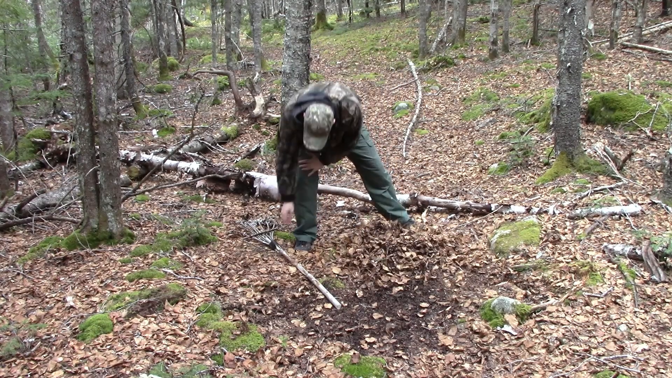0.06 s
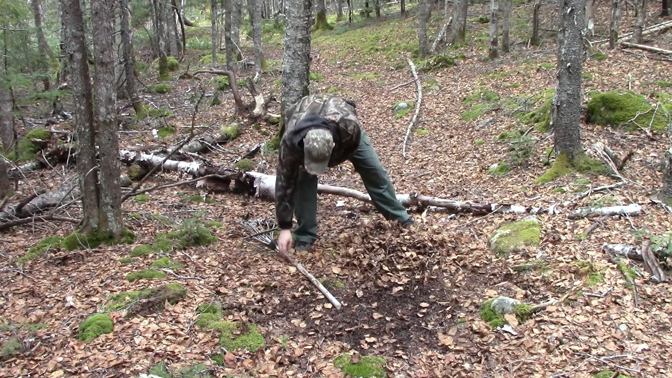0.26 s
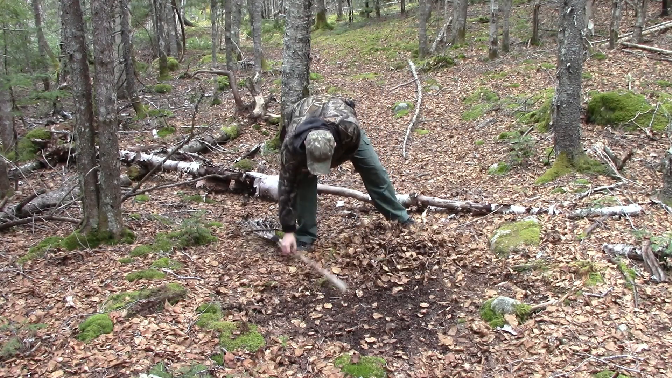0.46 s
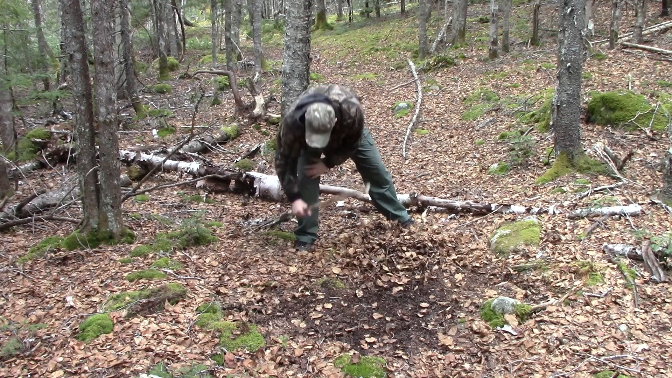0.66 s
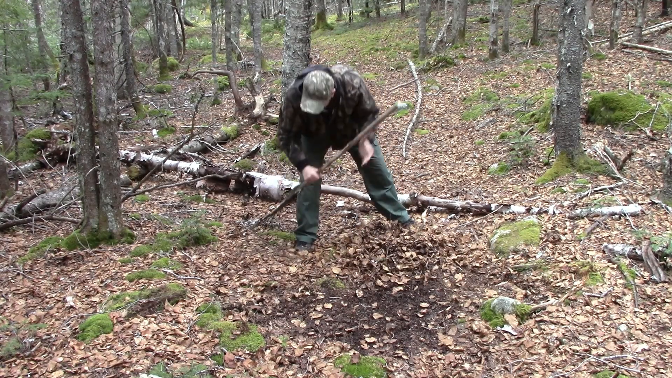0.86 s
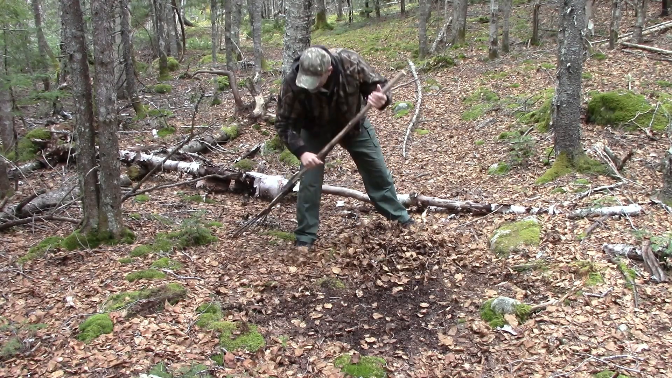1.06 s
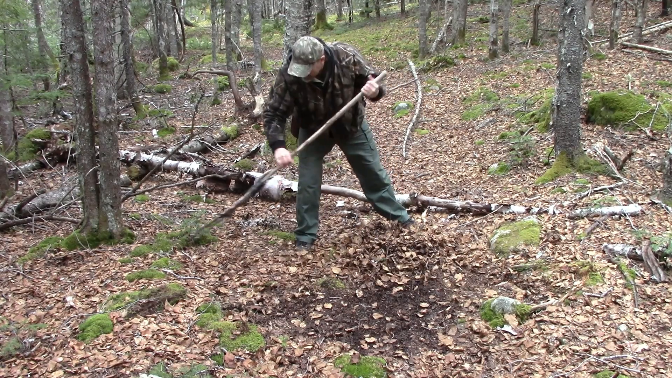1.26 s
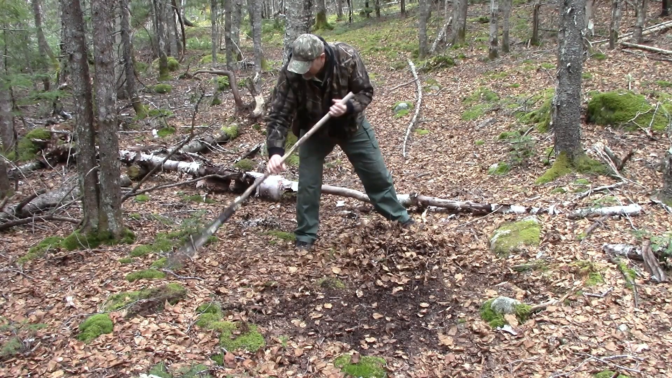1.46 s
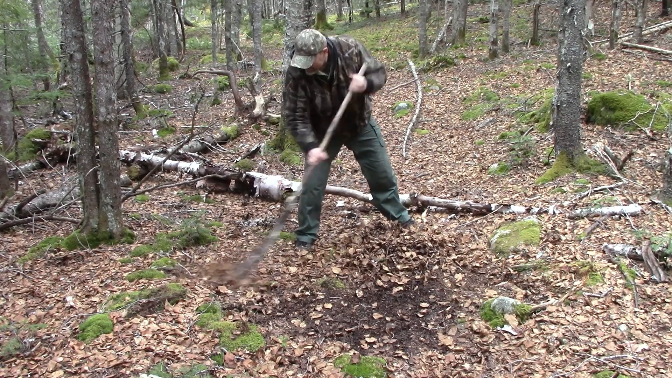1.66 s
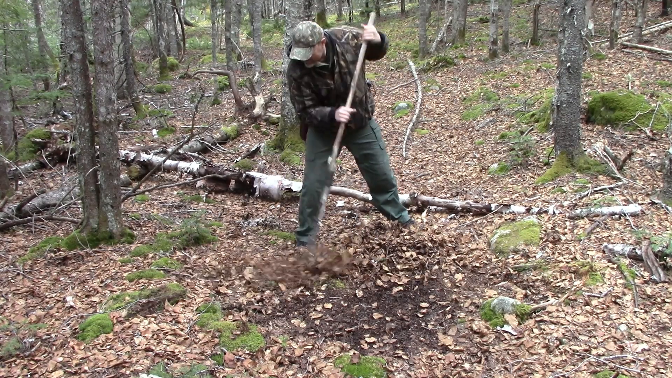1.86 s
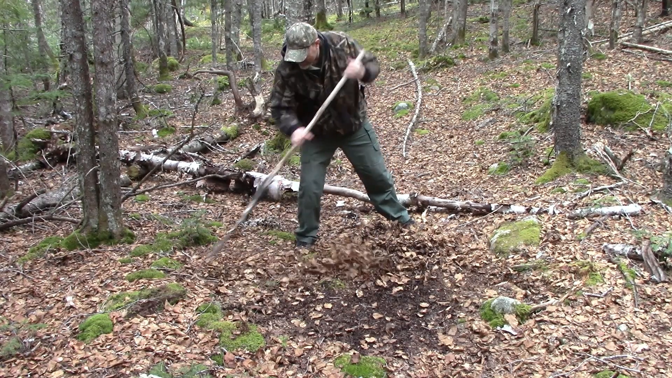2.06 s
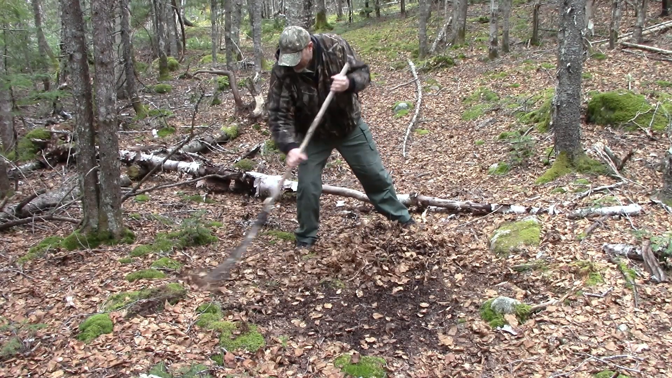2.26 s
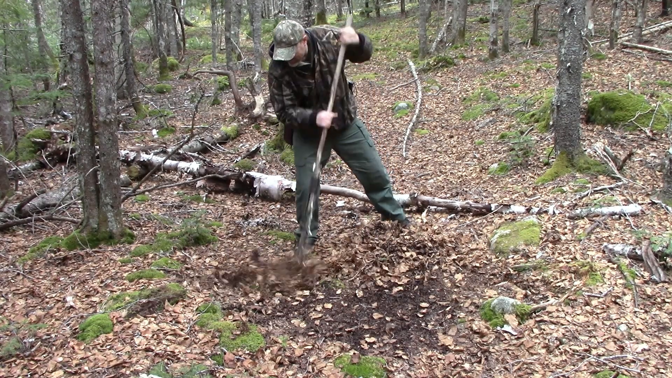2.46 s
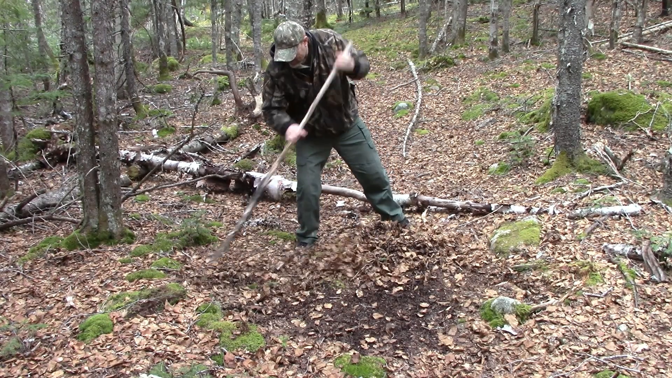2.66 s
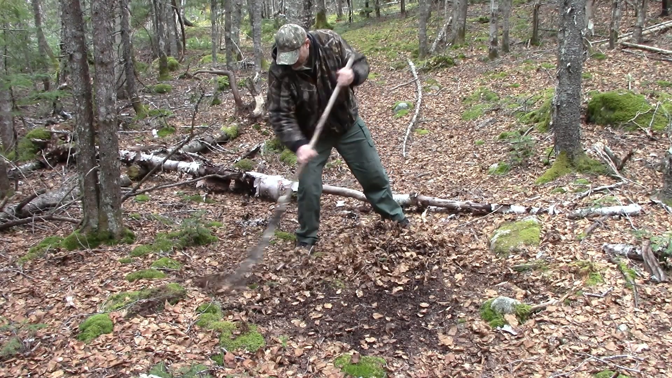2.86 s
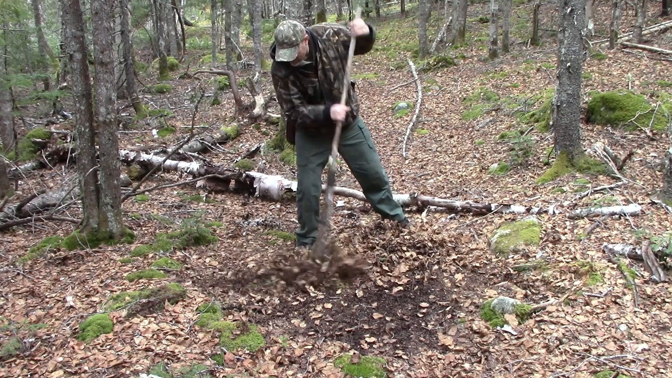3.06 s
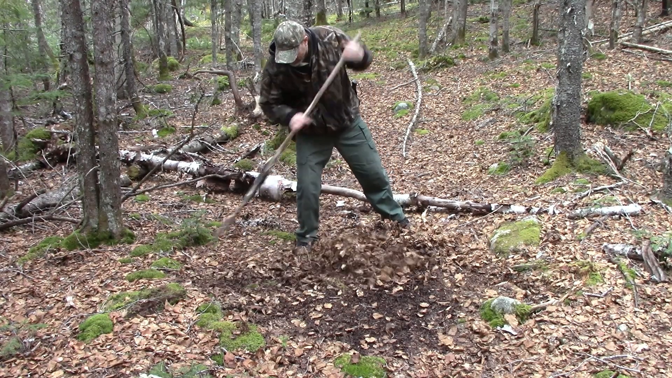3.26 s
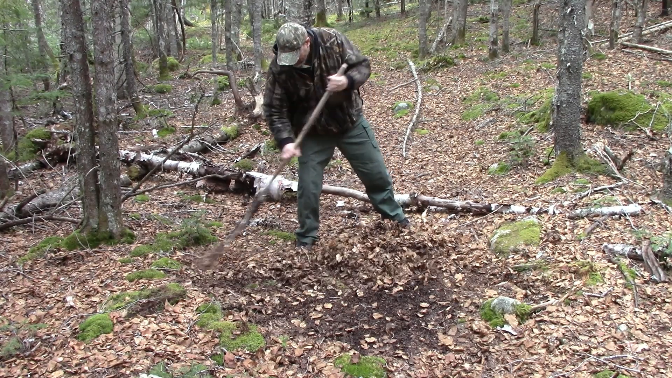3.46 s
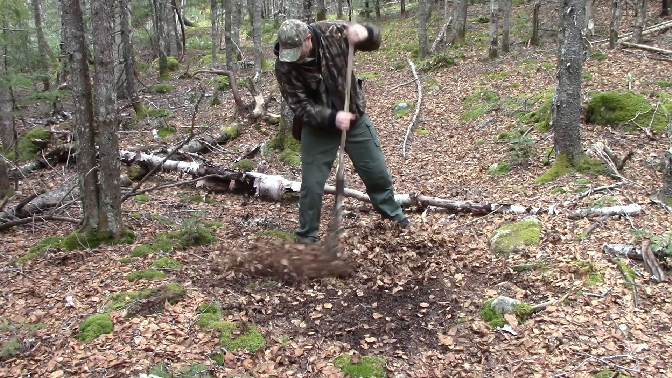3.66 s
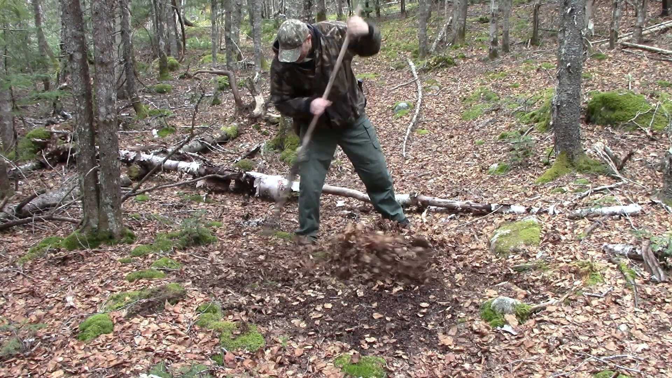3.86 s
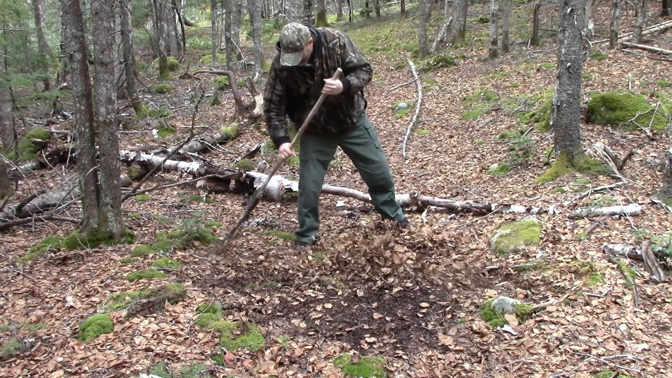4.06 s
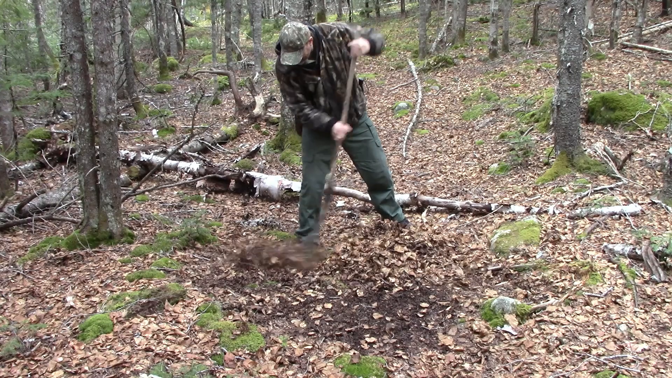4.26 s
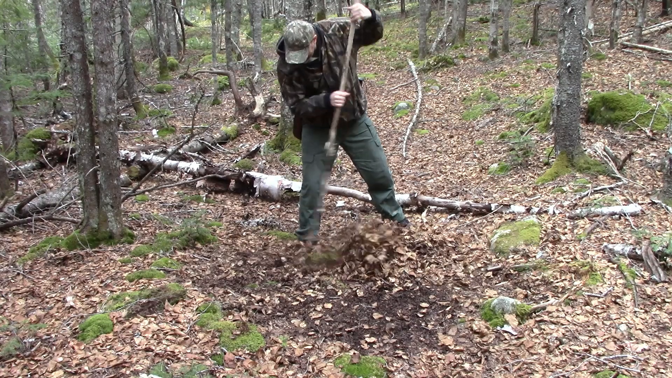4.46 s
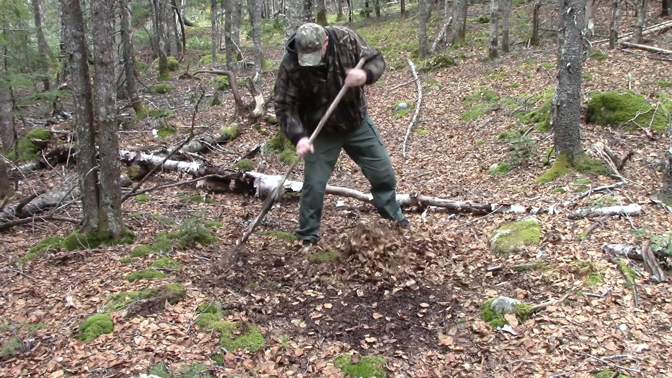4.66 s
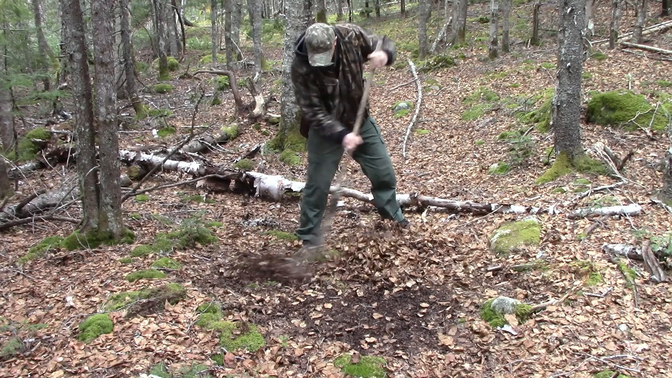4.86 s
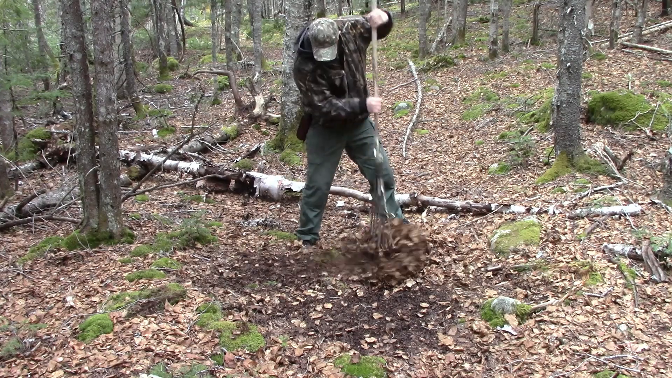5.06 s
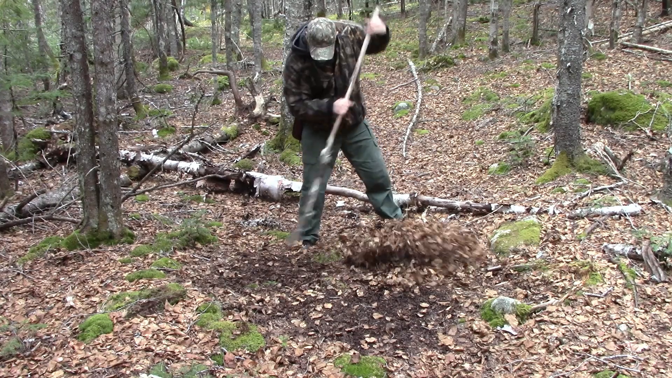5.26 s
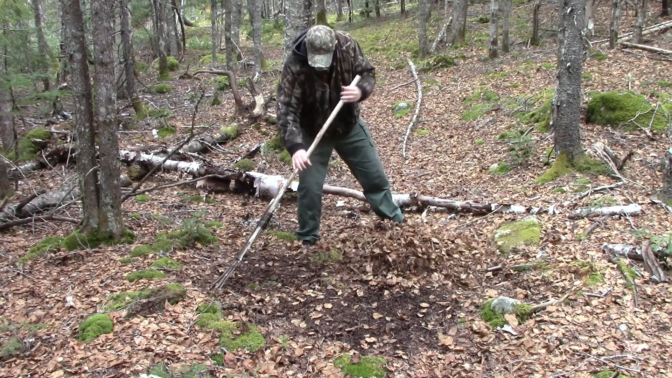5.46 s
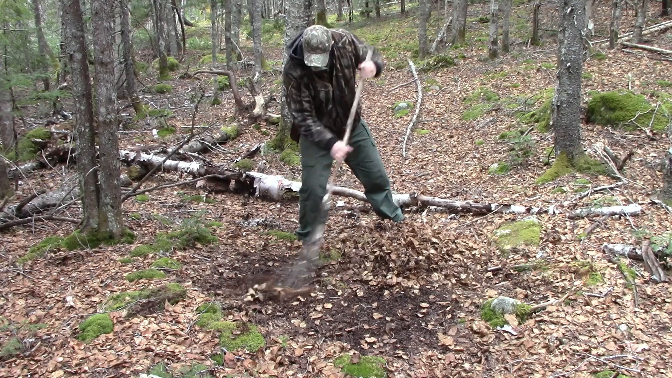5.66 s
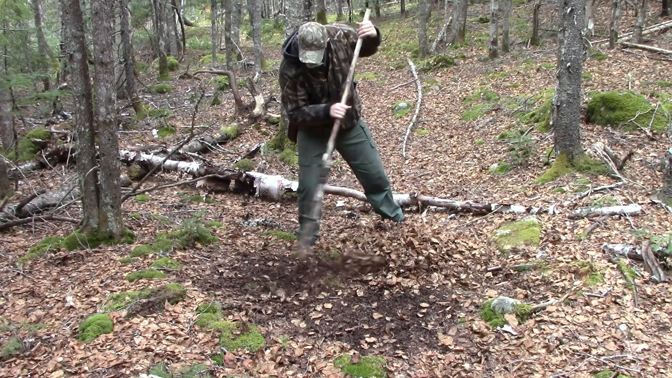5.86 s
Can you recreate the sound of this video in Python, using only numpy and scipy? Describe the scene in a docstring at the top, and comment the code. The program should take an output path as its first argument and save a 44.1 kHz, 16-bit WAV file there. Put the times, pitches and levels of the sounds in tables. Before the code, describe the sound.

Small ticks and rustles of litter underfoot come first, then a handling crunch as the rake is lifted. Seven quick pulls follow at roughly two-thirds-second intervals, each swelling from a bite into a dense, bright crackling rush and stopping fast. Falling leaves, small crunches and occasional stick breaks fill the gaps. Outdoor forest, faint steady murmur, light echo, centred microphone at a moderate distance.

```python
"""Forest floor: a rake is picked up and pulled seven times through dry leaves, with the woods murmuring far off.
Leaves, ticks and soil are random fractures, coloured noise grains whose level follows the pulls and stirs.
Between pulls the tossed leaves patter down. Brief leaf crunches, sticks and snaps are noise bursts.
A noise tail stands for the echo from the trunks; the murmur is slowly wavering coloured noise."""
import sys
import numpy as np
from scipy import signal
from scipy.fft import rfft, irfft
from scipy.io import wavfile
from scipy.ndimage import uniform_filter1d

SR = 44100
rng = np.random.default_rng(int(sys.argv[2]) if len(sys.argv) > 2 else 0)


def file_out(sig):
    """Save sig as 16-bit WAV at sys.argv[1]."""
    # one column per channel
    cols = np.atleast_2d(sig).T
    # limit, then scale
    lim = np.clip(cols, -1, 1)
    pcm = np.round(lim * 32767).astype(np.int16)
    wavfile.write(sys.argv[1], SR, pcm)


N = 260190

# Spectra: (frequency [Hz], relative density [dB])
WOODS_SPECTRUM = [(20, -19), (100, -20.5), (160, -19.5), (250, -13.5), (400, -6), (600, -2), (830, 0.5),
                  (1100, -2.5), (1600, -7), (3000, -12), (8000, -17.5), (16000, -20)]
CRACKLE_SPECTRUM = [(100, -72), (300, -64), (1200, -16), (3000, -15.5), (4000, -6), (4800, -11),
                    (5500, -5.5), (6200, -4), (7000, -0.5), (8000, -0.5), (9500, -3), (11000, -4.5),
                    (12400, -8.5), (13600, -6), (16000, -13)]
CRUNCH_SPECTRUM = [(80, -60), (200, -33), (700, -10), (1300, -6.5), (2000, -1.5), (2800, 2), (3300, -0.5),
                   (3900, -0.5), (4800, -5), (8000, -8), (16000, -42)]
SCUFF_SPECTRUM = [(60, -38), (150, -36), (210, -22), (320, -8.5), (500, -2), (750, 1.5), (1100, 3.5),
                  (1800, -8), (5000, -14.5)]
ECHO_SPECTRUM = [(100, -8), (500, -1), (1200, -2), (3000, 1), (8000, -1), (16000, -3.5)]
STICK_SPECTRUM = [(100, -52), (600, -6.5), (1100, -12), (1900, 3), (3000, 0), (4500, -4), (8000, -15),
                  (16000, -30)]
# Large to small leaf fragments: (lowest [Hz], highest [Hz], cracks relative to rate of breaking leaves [1])
FRAGMENT_BANDS = [(600, 4400, 0.2), (4600, 7600, .4), (7530, 10160, 0.81), (10300, 16200, 1.7)]
# Boots and hand stir the litter: (start [s], length [s], crackle [dB])
LITTER_STIRS = [(.09, 0.047, -52), (0.252, 0.16, -48.5), (0.485, 0.037, -50.5), (0.595, .02, -50.5),
                (.688, 0.013, -48), (.797, .16, -36.5), (1.317, 0.018, -55)]
# Loudest single leaves and twigs that snap: (time [s], relative level [dB])
LOUD_SNAPS = [(0.136, -29.5), (.191, -31.5), (0.26, -32), (0.33, -29), (1.1284, -35), (1.233, -34),
              (1.4527, -18), (2.8263, -5), (3.431, -7), (4.367, -16.5), (5.692, -18)]
# Tines strike or catch, or leaves crunch briefly as the rake is lifted: (time [s], level [dB], hold [s])
BRIEF_CRUNCHES = [(.781, -39.5, .02), (.825, -33.5, 0.013), (.862, -32, 0.0095), (.935, -35.5, 0.0091),
                  (1.017, -38.5, 0.01), (1.417, -37, 0.0094), (3.292, -26.5, 0.025), (3.844, -30, .015),
                  (3.944, -31, 0.031), (4.785, -27, .015), (5.489, -32.5, 0.013)]
# Leaves coming down after the rake has lifted them: (thickest [s], crackle [dB], spread [s])
LEAF_SHOWERS = [(1.04, -48, .11), (1.99, -36, .28), (2.54, -35.5, 0.18), (3.28, -36.6, 0.18),
                (3.93, -32.5, 0.21), (4.725, -33.5, 0.19), (5.253, -31.5, 0.1), (5.823, -34.5, 0.054)]
# Pulls of the rake: (bite [s], full speed [s], easing off [s], crackle at bite [dB], at full speed [dB],
# at easing off [dB], fade [dB/s], peak soil scuff relative to peak crackle [dB])
RAKE_PULLS = [(1.456, 1.566, 1.726, -30.5, -15.5, -19.5, 187, -22),
              (2.133, 2.226, 2.35, -30, -18.5, -22.5, 109, -20),
              (2.721, 2.868, 2.903, -28.5, -20, -20.3, 61, -18.5),
              (3.342, 3.443, 3.566, -29.5, -16.5, -17.5, 82, -21.5),
              (4.044, 4.087, 4.248, -30, -21.5, -17, 124, -19),
              (4.756, 4.874, 4.926, -31.3, -18, -20.5, 85, -17.5),
              (5.466, 5.544, 5.656, -39, -24.5, -25.5, 151, -19.5)]
# Sticks that crunch under the tines: (time [s], relative level [dB])
STICK_BREAKS = [(1.478, -23.5), (2.3454, -23), (2.4177, -15), (3.4605, -16), (4.2816, -14.5)]

WOODS_DB = -53
LITTER_DB = -62.5  # leaves that keep shifting underfoot
STIR_RISE_DB_PER_S, STIR_FALL_DB_PER_S = 650, 230
BITE_RISE_DB_PER_S = 1100  # crackle sets in as the tines bite
RUN_UP_POWER = 1.18  # slow start, then gathering speed
LIFT_DROP_DB, LIFT_S = 1.7, 0.0087  # quick drop as the tines leave the ground
SCUFF_LAG_S = 0.013  # tines reach the soil after the leaves
SCUFF_DB_PER_CRACKLE_DB = 1.01  # tines dig deeper at speed
SHOWER_THUD_DB = -16.5  # tossed leaves thud as they land, relative to the crackle
TYPICAL_CRACKLE_DB = -30
CRUNCH_DB, CRUNCH_DB_PER_CRACKLE_DB = -7.5, 0.005  # whole leaves at typical crackle; growth
CRUNCH_LAG_S = 0.0071  # whole leaves buckle after their edges have cracked
TICKS_PER_S, TICK_DB, TICK_DB_PER_CRACKLE_DB, TICK_SPREAD_DB = 80, -26.5, 0.56, 2.5
CUTOFF_HZ = 15850


def from_db(db):
    """Decibels to gain."""
    return 10 ** (np.asarray(db) / 20)


def together(levels_db):
    """Power sum of independent sounds [dB]."""
    power = np.sum(from_db(np.maximum(levels_db, -120)) ** 2, axis=0)
    return 10 * np.log10(power)


def rms_one(x):
    """Scale to unit power."""
    return x / np.sqrt(np.mean(x ** 2) + 1e-20)


def drift(rate_hz):
    """Low-passed noise with spread 1, computed at every 40th sample."""
    step, settle = 40, 2000
    r = np.exp(-2 * np.pi * rate_hz * step / SR)
    noise = rng.standard_normal(N // step + settle + 2)
    slow = signal.lfilter([1], [1, -2 * r, r * r], noise)[settle:]
    return np.interp(np.arange(N) / step, np.arange(len(slow)), rms_one(slow))


def coloured(x, spectrum, size=4096):
    """Causal (minimum-phase) filter of unit energy; white noise keeps its power."""
    hz, db = np.transpose(spectrum)
    bins_hz = np.maximum(np.arange(size // 2 + 1) * SR / size, 1)
    gain = from_db(np.interp(np.log(bins_hz), np.log(hz), db))
    cepstrum = irfft(np.log(gain))
    # fold to minimum phase
    cepstrum[1:size // 2] *= 2
    cepstrum[size // 2 + 1:] = 0
    response = irfft(np.exp(rfft(cepstrum)))
    return signal.oaconvolve(x, response / np.linalg.norm(response))[:N]


def bandpass(x, order, low_hz, high_hz):
    """Butterworth band-pass."""
    sos = signal.butter(order, [low_hz, high_hz], "band", fs=SR, output="sos")
    return signal.sosfilt(sos, x)


def dying_noise(t60_s, size):
    """Exponentially fading noise burst of unit energy."""
    burst = rng.standard_normal(size) * from_db(-60 * np.arange(size) / SR / t60_s)
    return burst / np.linalg.norm(burst)


def grains(per_s, spread_db, crumble_s):
    """Random fractures of uneven size, each a tiny noise burst; power kept near 1."""
    born = rng.random(N) < per_s / SR
    sizes = from_db(spread_db * np.minimum(rng.exponential(1, N), 4.5))
    keep = np.exp(-1 / (crumble_s * SR))
    power = signal.lfilter([1 - keep], [1, -keep], born * sizes ** 2 + 1e-9)
    mean = uniform_filter1d(uniform_filter1d(power, size=1500), size=1500)
    return np.sqrt(power / (np.abs(mean) + 1e-9)) * rng.standard_normal(N)


def woods(waver_db=0.56):
    """Far wind or water: a steady murmur of coloured noise with a slight waver."""
    level = from_db(WOODS_DB + waver_db * drift(8.9))
    return level * coloured(rng.standard_normal(N), WOODS_SPECTRUM)


def stir_db(t, start_s, length_s, db):
    """A stir of the litter rises steeply, holds and falls more slowly."""
    rise = STIR_RISE_DB_PER_S * np.maximum(start_s - t, 0)
    fall = STIR_FALL_DB_PER_S * np.maximum(t - start_s - length_s, 0)
    return db - rise - fall


def shower_db(t, thickest_s, db, spread_s):
    """Falling leaves thicken and thin out as a Gaussian in power."""
    return db - 10 / np.log(10) * ((t - thickest_s) / spread_s) ** 2


def pull_db(t, bite_s, full_s, ease_s, bite_db, full_db, ease_db, fade_db_per_s):
    """The tines bite, gather speed, drag the growing heap and lift out."""
    run_up = np.clip((t - bite_s) / (full_s - bite_s), 0, 1) ** RUN_UP_POWER
    drag = np.interp(t, [full_s, ease_s], [full_db, ease_db]) + (bite_db - full_db) * (1 - run_up)
    after_s = np.maximum(t - ease_s, 0)
    lift = LIFT_DROP_DB * (1 - np.exp(-after_s / LIFT_S)) + fade_db_per_s * after_s
    return drag - BITE_RISE_DB_PER_S * np.maximum(bite_s - t, 0) - lift


def activity():
    """Leaf crackle [dB] and soil scuff [dB] from all stirs, showers and pulls."""
    t = np.arange(N) / SR
    crackle, scuff = [np.full(N, LITTER_DB)], []
    for stir in LITTER_STIRS:
        crackle.append(stir_db(t, *stir))
    for shower in LEAF_SHOWERS:
        falling = shower_db(t, *shower)
        crackle.append(falling)
        scuff.append(falling + SHOWER_THUD_DB)
    for *stroke, relative_db in RAKE_PULLS:
        crackle.append(pull_db(t, *stroke))
        digging = pull_db(t - SCUFF_LAG_S, *stroke)
        peak_db = digging.max()
        scuff.append(peak_db + relative_db + SCUFF_DB_PER_CRACKLE_DB * (digging - peak_db))
    return together(crackle), together(scuff)


def crunch_db(crackle_db):
    """Whole-leaf crunch relative to the crackle [dB]: it builds later and lingers."""
    t = np.arange(N) / SR
    lagging = np.interp(t - CRUNCH_LAG_S, t, crackle_db) - crackle_db
    return CRUNCH_DB + CRUNCH_DB_PER_CRACKLE_DB * (crackle_db - TYPICAL_CRACKLE_DB) + lagging


def leaves(crackle_db, full_per_s=11000, full_db=-15, crowding=.6, clump_db=0.86):
    """Harder pulls break more leaves a second: sparse ticks merge into a clumpy rush."""
    per_s = full_per_s * from_db(crowding * (crackle_db - full_db))
    level = from_db(crackle_db + clump_db * drift(82))
    # fragment size sets the band; small ones are the most numerous
    cracks = 0
    for low_hz, high_hz, share in FRAGMENT_BANDS:
        fractures = grains(per_s * share, spread_db=1.5, crumble_s=0.00083)
        cracks = cracks + bandpass(fractures, 2, low_hz, high_hz)
    # veins tear with a broadband click
    tears = grains(per_s * 0.49, spread_db=0.5, crumble_s=0.00022)
    edges = coloured(from_db(-3.0) * cracks + from_db(-6.5) * tears, CRACKLE_SPECTRUM)
    # whole blades buckle more slowly and lower
    blades = coloured(grains(per_s * .5, spread_db=-0.5, crumble_s=0.0023), CRUNCH_SPECTRUM)
    return level * (edges + from_db(crunch_db(crackle_db)) * blades)


def ticks(crackle_db, t60_s=0.005, octaves=0.79):
    """Single leaves click at random, each in one of six bands, louder where more leaves move."""
    born = rng.random(N) < TICKS_PER_S / SR
    scatter_db = TICK_SPREAD_DB * np.clip(rng.standard_normal(N), -2, 2)
    dealt = rng.integers(0, 6, N)
    follow_db = TICK_DB_PER_CRACKLE_DB * (crackle_db - TYPICAL_CRACKLE_DB)
    strength = from_db(TICK_DB + follow_db + scatter_db)
    keep = from_db(-60 / (t60_s * SR)) ** 2
    half_band = 2 ** (octaves / 2)
    out = np.zeros(N)
    for k, hz in enumerate(np.geomspace(3000, 11000, 6)):
        power = signal.lfilter([1], [1, -keep], born * (dealt == k) * strength ** 2 + 1e-18)
        clicks = np.sqrt(power) * rng.standard_normal(N)
        out += bandpass(clicks, 1, hz / half_band, hz * half_band)
    return coloured(out, CRACKLE_SPECTRUM)


def soil(scuff_db, trim_db=0.07):
    """Tines stick and slip through litter and humus: dull, coarse grains."""
    slips = grains(1200, spread_db=2.5, crumble_s=0.0013)
    return from_db(scuff_db + trim_db) * coloured(slips, SCUFF_SPECTRUM)


def forest(x, t60_s=0.79, wet_db=-13):
    """Trunks and slope send back a thin, coloured noise tail."""
    tail = signal.oaconvolve(x, dying_noise(t60_s, size=65536))[:N]
    return from_db(wet_db) * coloured(tail, ECHO_SPECTRUM)


def snaps(crack_t60_s=0.0085, settle_t60_s=0.058, settle_db=-2, gain_db=9.0):
    """A stiff leaf or twig gives way with a sharp crack and shakes its neighbours."""
    out = np.zeros(N + 4096)
    for s, db in LOUD_SNAPS:
        crack = dying_noise(crack_t60_s, size=4096)
        settling = from_db(settle_db) * dying_noise(settle_t60_s, size=4096)
        out[int(s * SR):][:4096] += from_db(db + gain_db) * (crack + settling)
    return coloured(out[:N], CRACKLE_SPECTRUM)


def brief_crunches(settle_s=0.011, blades_db=-8):
    """A short even crunch of leaves, as tines strike, catch or lift, that stops quickly."""
    t, level = np.arange(N) / SR, np.zeros(N)
    for s, db, hold_s in BRIEF_CRUNCHES:
        level += from_db(db) * (t >= s) * np.exp(-np.maximum(t - s - hold_s, 0) / settle_s)
    crush = level * grains(6000, spread_db=2.0, crumble_s=.0004)
    buckle = level * rng.standard_normal(N)
    return coloured(crush, CRACKLE_SPECTRUM) + from_db(blades_db) * coloured(buckle, CRUNCH_SPECTRUM)


def sticks(splinter_t60_s=0.072, gain_db=14.0):
    """A stick splinters longer and lower than a leaf."""
    out = np.zeros(N + 4096)
    for s, db in STICK_BREAKS:
        out[int(s * SR):][:4096] += from_db(db + gain_db) * dying_noise(splinter_t60_s, size=4096)
    return coloured(out[:N], STICK_SPECTRUM)


def scene():
    """Rake, echo and woods, in two identical channels."""
    crackle_db, scuff_db = activity()
    litter = leaves(crackle_db) + ticks(crackle_db) + soil(scuff_db)
    raking = litter + snaps() + brief_crunches() + sticks()
    return np.tile(woods() + raking + forest(raking), (2, 1))


def record(dry):
    """Steep linear-phase low-pass."""
    low_pass = signal.firwin(601, CUTOFF_HZ, fs=SR)
    return signal.oaconvolve(dry, low_pass[None], mode="same", axes=1)


dry = scene()
out = record(dry)
file_out(out)
```